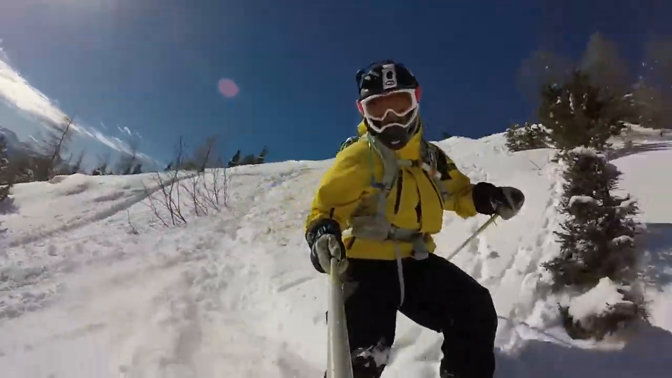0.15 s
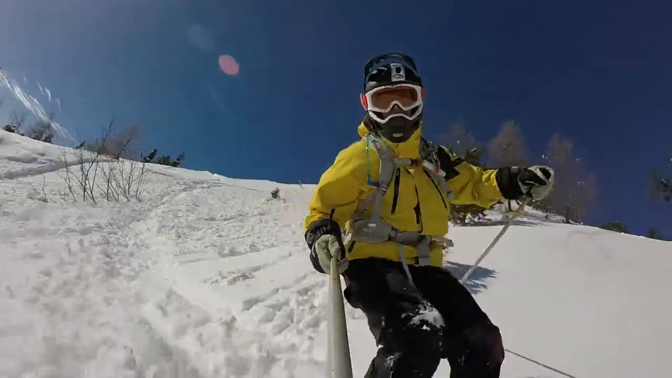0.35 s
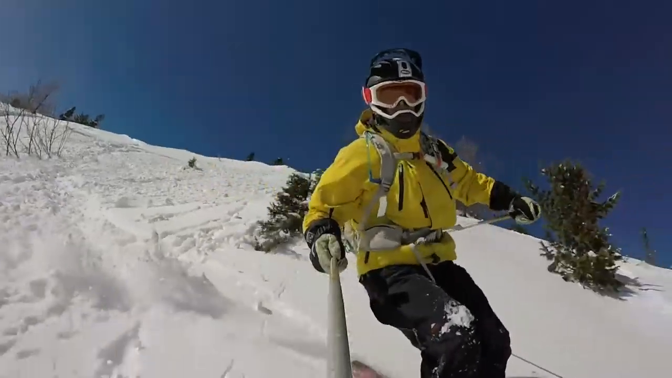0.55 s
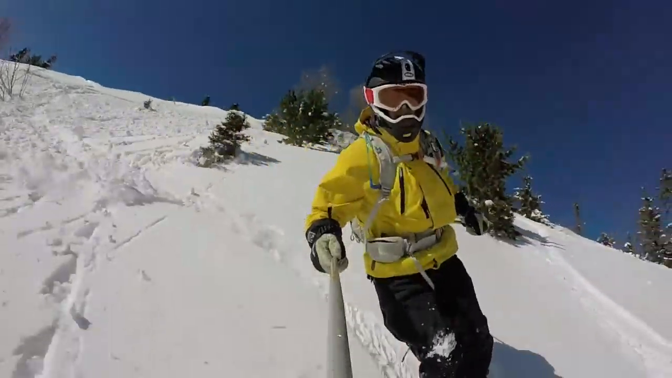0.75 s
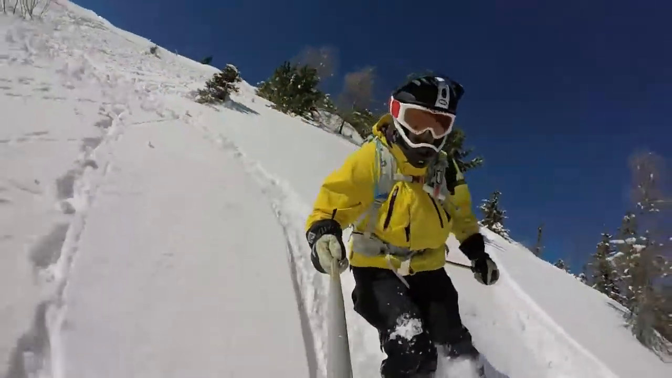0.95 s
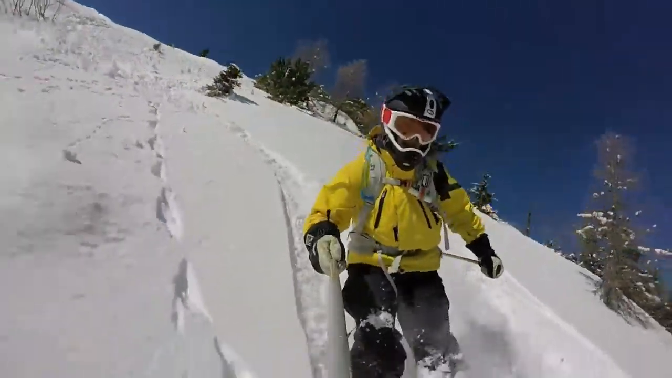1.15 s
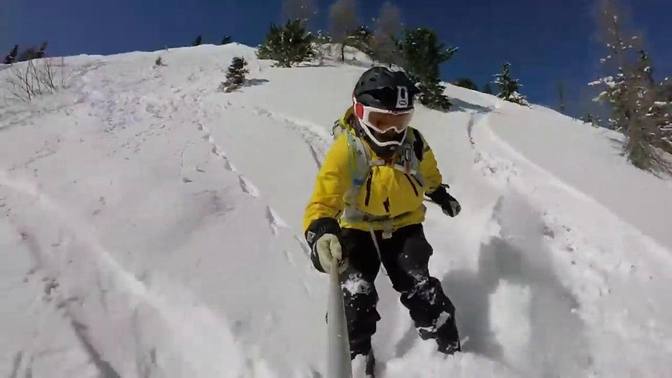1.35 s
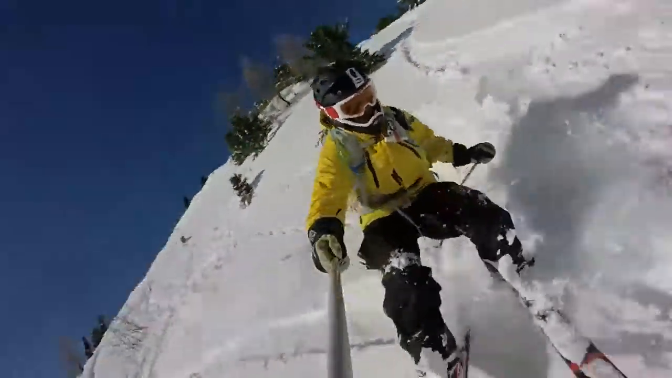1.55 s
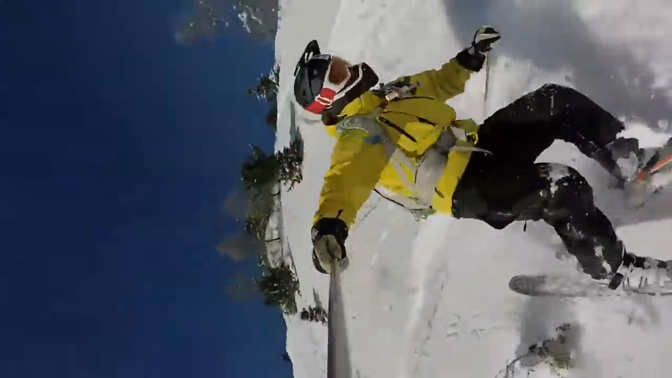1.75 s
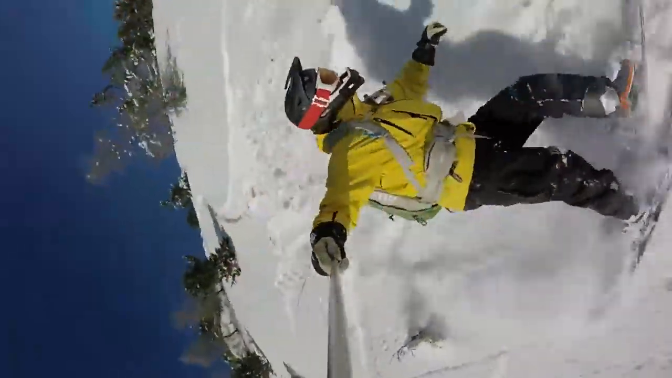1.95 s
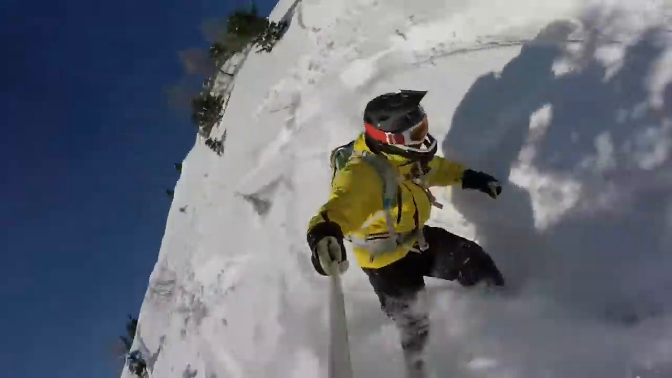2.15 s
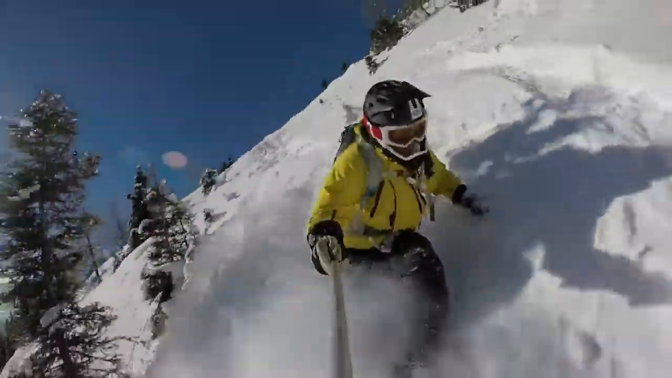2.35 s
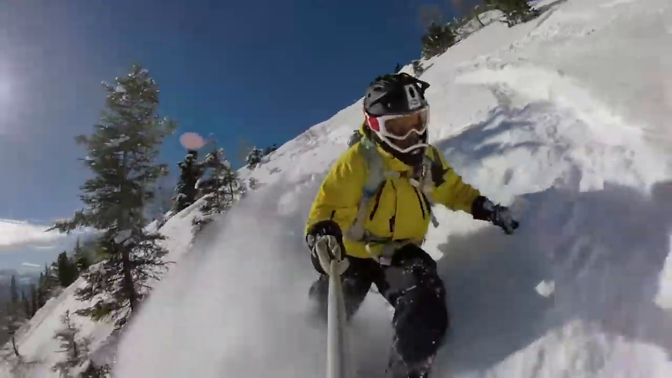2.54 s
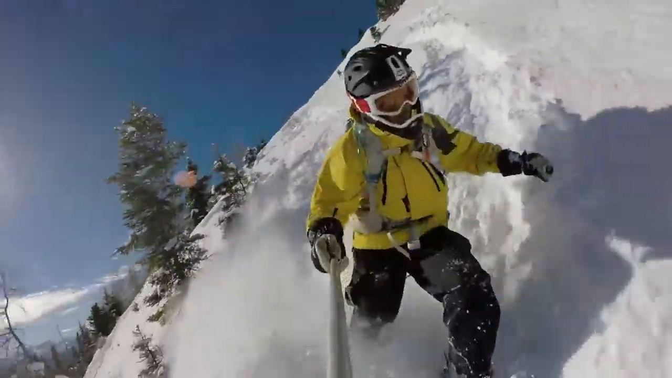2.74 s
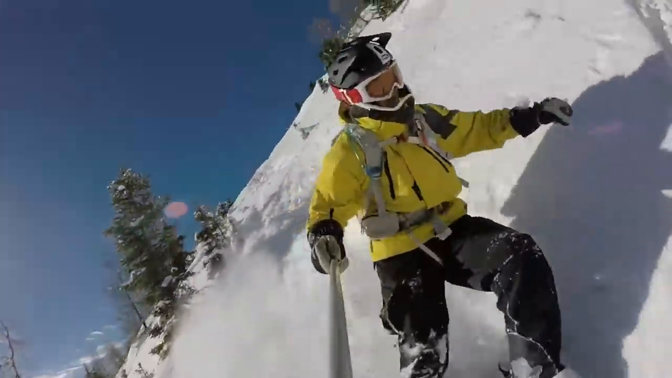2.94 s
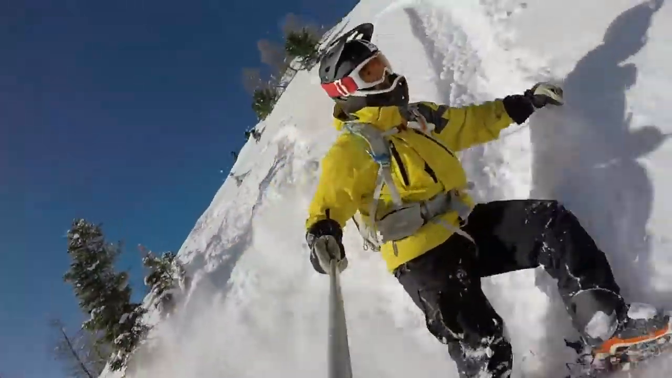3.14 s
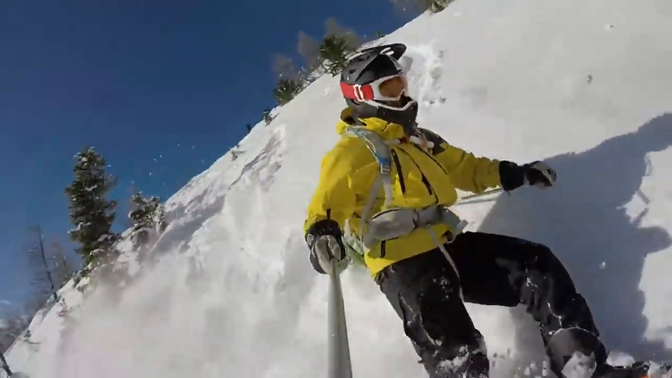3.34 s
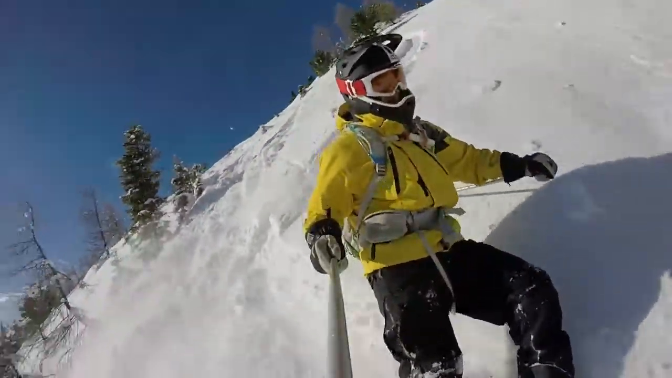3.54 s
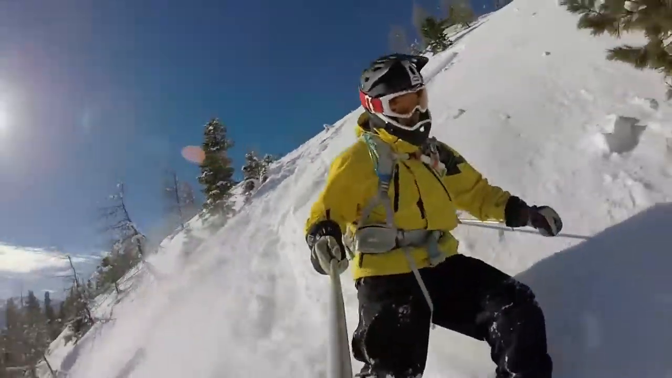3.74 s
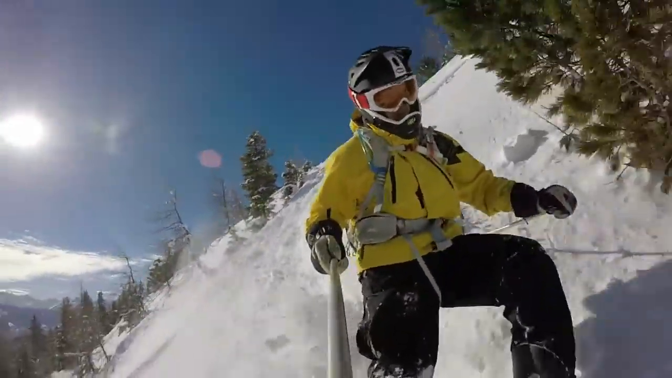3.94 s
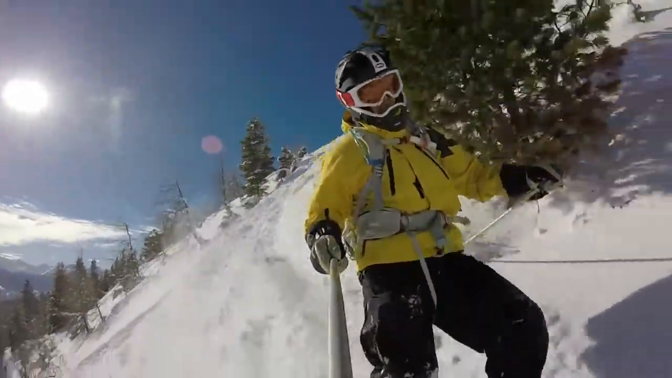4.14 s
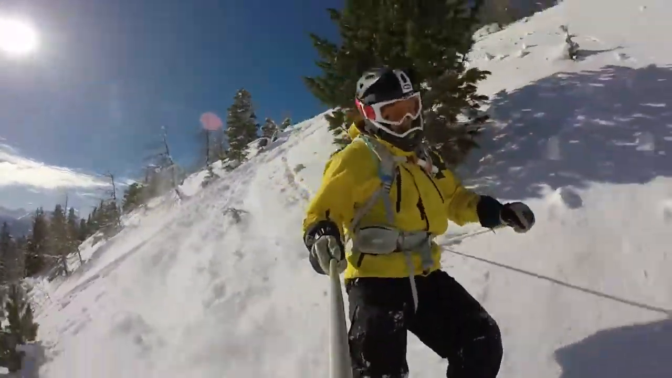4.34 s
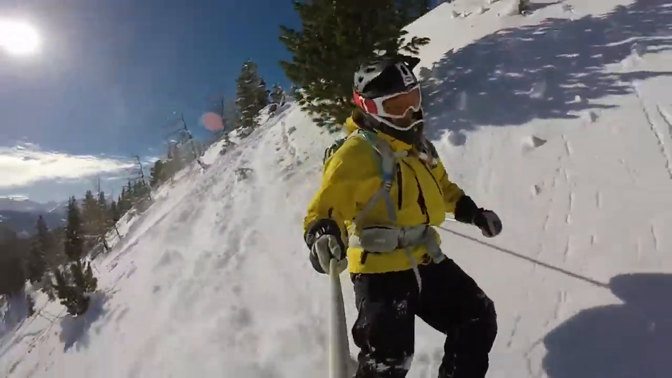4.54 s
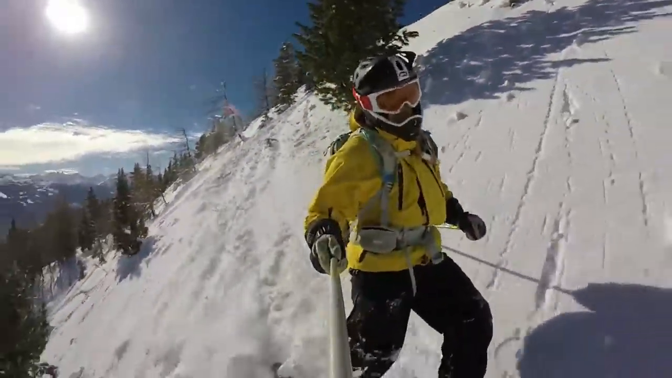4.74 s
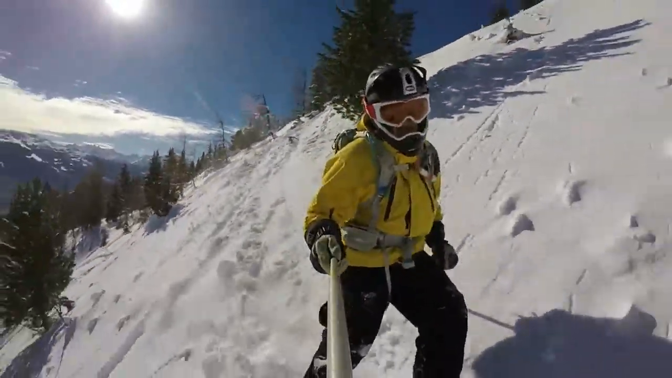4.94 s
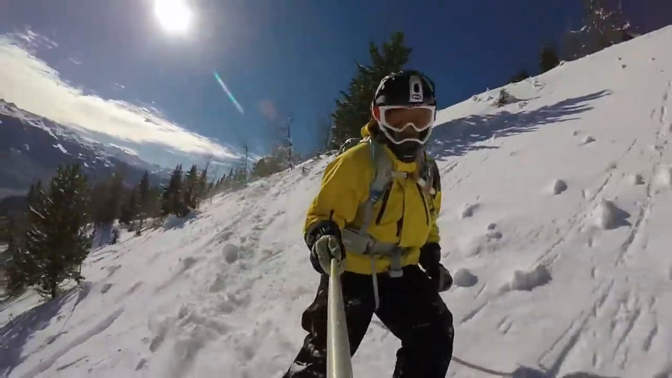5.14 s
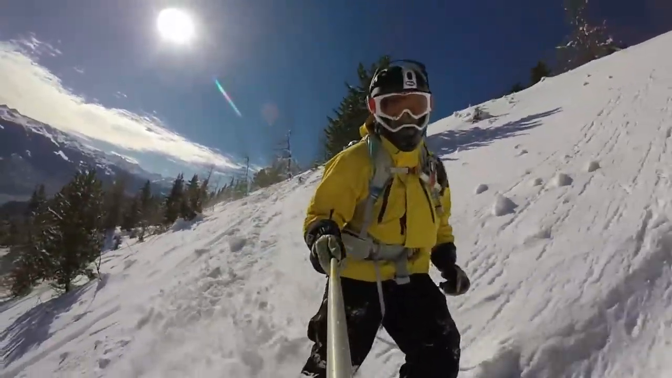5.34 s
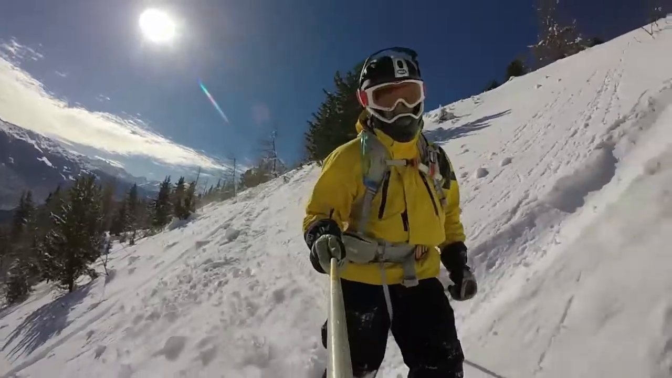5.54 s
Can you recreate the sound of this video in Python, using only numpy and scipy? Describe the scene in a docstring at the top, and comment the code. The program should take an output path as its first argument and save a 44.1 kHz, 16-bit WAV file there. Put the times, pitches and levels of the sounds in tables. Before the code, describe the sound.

Skis carve down a soft snowy slope, faint at first then scraping louder, under deep buffeting wind and a few hard clacks.

```python
"""Skiing down soft snow

A skier turns down a slope of soft snow, with a camera in a plastic housing at the end of a pole.
Wind thumps and flutters: noise shaped into big and small eddies. The skis hiss, scrape and throw
spray: showers of tiny random cracks, shaped by load. Crust snaps and lumps crunch: short swells of
coarse grains. Knocks ring the housing and the pole as damped resonances, with a gritty crack."""
import sys
import numpy as np
from scipy import signal
from scipy.fft import rfft, irfft, next_fast_len
from scipy.io import wavfile
from scipy.ndimage import uniform_filter1d, map_coordinates

SR = 44100
rng = np.random.default_rng(int(sys.argv[2]) if len(sys.argv) > 2 else 0)


def waveform_to_disk(signal):
    """Save audio, clipped to [-1, 1], as 16-bit WAV at the path in sys.argv[1]."""
    frames = np.transpose(np.atleast_2d(signal))
    scaled = np.clip(frames, -1, 1) * 32767
    samples = np.round(scaled).astype(np.int16)
    wavfile.write(sys.argv[1], SR, samples)


N = 250929  # length in samples

# Every level is a setting before the trims and wobbles that the functions add.
# slow rise and fall of the wind on the housing: t/s, level/dB
SLOW_WIND = [(0, -36), (.55, -37), (.95, -29.5), (1.5, -27.5), (1.95, -24.5), (2.13, -16), (2.5, -23.5),
             (2.63, -32), (3.1, -32.5), (3.5, -30), (3.85, -30.5), (4.15, -35.5), (5.0, -35.5),
             (5.69, -41.5)]
# single gusts: t/s at the peak, level over the slow wind/dB
SINGLE_GUSTS = [(.33, 2), (.82, 6.5), (1.17, 12.5), (2.71, 5.5), (3.32, 10), (3.66, 4), (4.44, 5),
                (5.11, 2.5)]
# the skis load in each turn and unload between turns:
# t/s, hiss of the bases/dB, rasp of the edges/dB, powder spray/dB
SKI_LEVELS = [(0.0, -65, -63, -68.5), (0.5, -65.5, -63.5, -74.5), (0.86, -68.0, -69, -74),
              (0.93, -61.0, -59.5, -65.5), (1.3, -61.5, -59.0, -68.5), (1.56, -64, -57, -76),
              (1.85, -60, -58, -66.5), (2.22, -62.0, -50.5, -66.5), (2.49, -60.5, -65, -68),
              (2.57, -52, -48, -56.5), (2.72, -49, -47, -65), (2.95, -52, -47, -63),
              (3.26, -51.5, -46.5, -64), (3.36, -61, -56.5, -70.0), (3.55, -63, -59, -71.5),
              (3.85, -50.5, -44.5, -59.5), (4.02, -55, -47, -66.5), (4.28, -49, -44.5, -57),
              (4.56, -50.5, -46.5, -59.5), (4.8, -56.5, -54.5, -63), (5.0, -49.5, -48, -58.5),
              (5.3, -58.5, -54, -68.5), (5.69, -58.5, -55.0, -65.5)]
# the skis flatten as the turn ends: t/s, share of the ploughing power that is a hollow scrape/0-1
SKI_FLATNESS = [(0, 0.034), (4.1, 0.046), (4.55, 0.34), (5.1, 0.45), (5.69, 0.6)]
# crust snapping under an edge: t/s at the peak, fade/s, level/dB, brightness/dB
CRUST_SNAPS = [(0.314, 0.0044, -42, -11), (0.886, 0.0036, -46.5, -5), (.959, 0.0044, -50, -10),
               (1.286, 0.0083, -37.5, -27), (1.813, 0.027, -49.5, 2), (2.047, 0.0066, -40, -4),
               (2.323, 0.0035, -43.5, -14), (3.642, 0.0016, -27.5, -17), (3.655, 0.024, -34.5, -18)]
# lumps of snow crushed under the skis: t/s at the peak, rise plus fall/s, level/dB, weight/dB,
# brightness/dB
SNOW_LUMPS = [(0.658, 0.016, -61, 13.5, -2), (1.126, 0.016, -49.5, 9, -11), (1.173, .036, -39, 4, -9.5),
              (1.207, 0.013, -43.5, 7, -11), (1.349, .035, -60, 17.5, -8), (1.47, 0.012, -52.5, 4.5, 0),
              (1.676, 0.02, -45.5, 2.5, -1.5), (1.767, 0.038, -47.5, 8, -13), (2.111, 0.039, -40, 10, -8),
              (2.754, 0.035, -45, 3.5, 4), (2.824, 0.01, -34, -8, -5), (3.081, 0.016, -36, -1.5, -6),
              (3.168, 0.049, -37, -3, -8), (3.262, 0.034, -32.5, -4.5, -3.5), (4.275, 0.031, -40, -8, -14)]
# knocks and soft bumps on the pole: t/s, level/dB, hardness as a treble limit f/Hz, thud/dB
POLE_KNOCKS = [(1.1135, -16, 6440, -21), (1.1150, -7, 3140, -23), (1.1157, -15, 2880, 7),
               (1.2627, -16, 3180, -19), (1.293, -28, 3100, -25), (1.957, -18.5, 2200, 2.5),
               (3.379, -51.5, 495, 18), (4.437, -50, 500, 13), (5.117, -50.5, 190, 12.5)]

# resonances of the housing: f/Hz, width/Hz, level/dB
HOUSING_MODES = [(632, 130, -10.5), (854, 97, -7.5), (1410, 124, -1.5), (1850, 290, -1), (2470, 460, -2),
                 (3210, 450, -1.5), (4340, 890, -6.5), (6640, 630, -10)]
# resonances of the pole: f/Hz, width/Hz, level/dB
POLE_MODES = [(138, 26.4, 5), (314, 57, -1.5), (413, 27, -10.5), (615, 127, -13), (860, 79, -18)]
# bands the housing changes, nearly all of them muffled: f/Hz, width/Hz, level/dB
HOUSING_BANDS = [(500, 44, -0.5), (985, 16, -4.5), (1680, 340, -2.5), (2130, 81, -4.5), (3840, 110, -10),
                 (13400, 520, 0.5)]

# Tone colours. Only the shape counts, because the coloured sound is set to an rms of 1.
# thump of the big eddies: f/Hz, level/dB
BUFFET_COLOUR = [(12, -12), (25, -4), (42, 2.5), (56, -4.5), (78, -4.5), (98, -17.5), (140, -22.5),
                 (190, -38.5), (300, -39.5), (450, -51), (1000, -51), (3000, -99)]
# flutter of the small eddies, and the thud of a lump: f/Hz, level/dB
FLUTTER_COLOUR = [(60, -56), (135, 2), (215, -5.5), (310, -3), (450, -10), (800, -12), (2000, -17),
                  (10000, -50)]
# snow pushed aside: f/Hz, level/dB
PLOUGH_COLOUR = [(100, -14), (300, -7), (480, -11), (850, -4), (1030, -10), (1200, -1), (1400, 0),
                 (1650, -1.5), (2020, 3.5), (2250, -1.5), (3500, -11), (12000, -85)]
# hollow scrape of flat skis: f/Hz, level/dB
HOLLOW_COLOUR = [(100, -36), (700, -11), (1050, -9.5), (1220, -3), (1450, 2), (1620, 2), (1900, -14),
                 (2250, -21), (3500, -39), (12000, -70)]
# rasp of edges and breaking snow: f/Hz, level/dB
RASP_COLOUR = [(300, -54), (1500, -11), (2200, -13), (2430, 3.5), (2650, 1), (3000, -0.5), (3400, -6),
               (3750, -20), (5000, -55), (12000, -70)]
# hiss of the gliding bases: f/Hz, level/dB
GLIDE_COLOUR = [(2500, -31), (3750, 2), (4200, -1.5), (4800, 1.5), (5150, -3), (5500, 4), (6300, -1),
                (6950, -18), (7600, -6), (8500, -16), (11000, -30.5), (15000, -43)]
# powder spray: f/Hz, level/dB
SPRAY_COLOUR = [(1000, -55), (4000, -2), (7000, -1), (8000, -0.5), (9600, -2.5), (11500, -7),
                (13000, -11.5), (14600, -17.5), (16000, -20)]
# body of crunching snow: f/Hz, level/dB
CRUNCH_COLOUR = [(100, -3), (350, -5.5), (500, -34), (740, -3), (790, -3), (870, 2.5), (1050, -10),
                 (1200, 1), (1360, 7), (1600, -2.5), (1820, 4), (2200, -4.5), (3500, -7.5), (12000, -51)]

GUST_S = 0.033  # rise of a gust, and its fall
DEEP_HZ = 96
PLOUGH_DB, PLOUGH_GROWS = -57, 0.79  # level at the average load; dB more for each dB of load
SNAP_ATTACK_S = 0.0014
RISE_SHARE = 0.7  # part of a lump's length in which it is squeezed before it gives way
CRACK_ATTACK_S, CRACK_FADE_S = 0.0002, 0.00095  # the gritty crack of a hard contact
TOP_HZ = 15500  # the camera keeps nothing from here up


def amp(db):
    """Turn decibels into a gain."""
    return 10 ** (np.asarray(db) / 20)


def unit(x):
    """Scale to an rms (average strength) of 1."""
    return x / np.sqrt(np.mean(x ** 2) + 1e-20)


def curves(rows):
    """Draw straight lines between table rows: one curve for each column after the time."""
    times, *columns = np.transpose(rows)
    return [np.interp(np.arange(N) / SR, times, column) for column in columns]


def wobble(rate):
    """Make a smooth random curve through `rate` random points a second."""
    points = rng.standard_normal(4096)
    return map_coordinates(points, [np.arange(N) * rate / SR], mode="wrap")


def swell(peak_s, rise, fall):
    """Make a bell-shaped envelope; rise and fall are the spreads in seconds on each side."""
    t = np.arange(N) / SR - peak_s
    return np.exp(-.5 * (t / np.where(t < 0, rise, fall)) ** 2)


def filtered(x, response):
    """Multiply the spectrum of x by a response to frequency."""
    size = next_fast_len(len(x) + 8192)  # spare room for the filter's tail
    spectrum = rfft(x, size) * response(np.fft.rfftfreq(size, 1 / SR))
    return irfft(spectrum, size)[:len(x)]


def coloured(x, colour):
    """Give x a tone colour, joining its points on a log frequency axis, at rms 1."""
    f, db = np.transpose(colour)
    return unit(filtered(x, lambda hz: amp(np.interp(np.log(hz + 1), np.log(f), db))))


def ring(x, modes):
    """Let x excite damped resonances; a wider one dies away faster."""
    def response(f):
        total = 0
        for k, (centre, width, db) in enumerate(modes):
            mode = 1j * f * width / (centre * centre - f * f + 1j * f * width)
            total = total + (-1) ** k * amp(db) * mode  # neighbours have opposite signs
        return total
    return filtered(x, response)


def crystals(rate, spread_db, smooth):
    """Scatter tiny cracks of uneven size, `rate` a second on average, over a smooth rush."""
    happens = rng.random(N) < rate / SR
    sign = rng.choice([-1, 1], N)
    # the cap limits loud cracks for a positive spread, faint ones for a negative spread
    size = amp(spread_db * np.minimum(rng.standard_normal(N), 2))
    return unit(unit(happens * sign * size) + smooth * rng.standard_normal(N))


def patchy(x, depth_db):
    """Vary the gain at random in patches a few hundred Hz wide and some 30 ms long."""
    z = signal.stft(x, nperseg=512)[2]
    field = uniform_filter1d(rng.standard_normal(z.shape), size=5, axis=0)  # across frequency
    field = uniform_filter1d(field, size=6, axis=1)  # across time
    return unit(signal.istft(z * amp(depth_db * unit(field)), nperseg=512)[1][:N])


def coarse(colour):
    """Make the coarse grains of packed snow as it breaks, at rms 1."""
    return coloured(patchy(crystals(rate=800, spread_db=5, smooth=0.61), depth_db=4.5), colour)


def wind(buffet_db=-4, flutter_db=-60, follow=0.25, unsteady_db=1.3, small_grows=0.77):
    """Big eddies thump the housing and deepen in gusts; small ones flutter and grow less."""
    gust_db = curves(SLOW_WIND)[0] + unsteady_db * wobble(9.8)
    for peak_s, db in SINGLE_GUSTS:
        gust_db += db * swell(peak_s, GUST_S, GUST_S)
    mean_db = np.mean(gust_db)
    excess_db = gust_db - mean_db

    eddies = coloured(rng.standard_normal(N), BUFFET_COLOUR)
    # the pressure of the eddies evens out within a gust
    local_power = uniform_filter1d(eddies ** 2, size=5000)
    eddies /= np.sqrt(np.abs(local_power) + 1e-6)
    deep = filtered(eddies, lambda hz: 1 / (1 + (hz / DEEP_HZ) ** 8))
    small = eddies - deep
    buffet = amp(excess_db) * deep + amp(small_grows * excess_db) * small

    flutter = coloured(rng.standard_normal(N), FLUTTER_COLOUR)
    flutter = unit(flutter * amp(1.86 * wobble(35)))
    return amp(mean_db + buffet_db) * buffet + amp(flutter_db + follow * excess_db) * flutter


def skis(spray_db=3, hollow_db=2):
    """Snow grains break under the skis; the uneven surface makes all the hiss stutter together."""
    base_db, edge_db, powder_db = curves(SKI_LEVELS)
    load_db = (base_db + edge_db) / 2
    flat = curves(SKI_FLATNESS)[0]
    bumps_db = 1.0 * wobble(28) + 1.1 * wobble(130)
    grains = patchy(crystals(rate=2500, spread_db=3.5, smooth=1.0), depth_db=1.5)

    # snow pushed aside, turning to a hollow scrape as the skis flatten
    scrape = patchy(crystals(rate=2000, spread_db=3.5, smooth=0.51), depth_db=1.5)
    scrape = amp(hollow_db) * coloured(scrape, HOLLOW_COLOUR)
    pushed = np.sqrt(1 - flat) * coloured(grains, PLOUGH_COLOUR) + np.sqrt(flat) * scrape
    plough_db = PLOUGH_DB + PLOUGH_GROWS * (load_db - np.mean(load_db))
    plough = amp(plough_db + 1.5 * bumps_db) * pushed

    # the steel edges chatter on their own as well
    edge = patchy(crystals(rate=1500, spread_db=3, smooth=1.0), depth_db=2.0)
    rasp = amp(edge_db + bumps_db + 1.25 * wobble(60)) * coloured(edge, RASP_COLOUR)
    glide = amp(base_db + 0.67 * bumps_db) * coloured(grains, GLIDE_COLOUR)

    # powder flies in uneven puffs
    dust = patchy(crystals(rate=3000, spread_db=-2.0, smooth=0.92), depth_db=2.75)
    puffs_db = powder_db + spray_db + 0.6 * bumps_db + 2.2 * wobble(13)
    spray = amp(puffs_db) * coloured(dust, SPRAY_COLOUR)
    return plough + rasp + glide + spray


def snaps(rasp_db=-2, body_db=-11, hiss_db=-5, dust_db=-13):
    """Crust breaks at once under an edge and dies away in a gritty rasp."""
    breaking, dry_part = np.zeros((2, N))
    for peak_s, fade, db, bright_db in CRUST_SNAPS:
        snap = amp(db) * swell(peak_s, SNAP_ATTACK_S, fade)
        breaking += snap
        dry_part += snap * amp(bright_db)
    grit = amp(rasp_db) * coarse(RASP_COLOUR) + amp(body_db) * coarse(CRUNCH_COLOUR)
    hiss = amp(hiss_db) * coarse(GLIDE_COLOUR) + amp(dust_db) * coarse(SPRAY_COLOUR)
    return breaking * grit + dry_part * hiss


def lumps(body_db=-4, thud_db=-9, rasp_db=-2, hiss_db=-4, dust_db=-22):
    """Each lump collapses in a swell of coarse grains; heavy ones thud, dry ones hiss."""
    crush, heavy, dry_part = np.zeros((3, N))
    for peak_s, length, db, weight_db, bright_db in SNOW_LUMPS:
        lump = amp(db) * swell(peak_s, RISE_SHARE * length, (1 - RISE_SHARE) * length)
        crush += lump
        heavy += lump * amp(weight_db)
        dry_part += lump * amp(bright_db)
    body = amp(body_db) * coarse(CRUNCH_COLOUR) + amp(thud_db) * coarse(FLUTTER_COLOUR)
    rasp = amp(rasp_db) * coarse(RASP_COLOUR)
    hiss = amp(hiss_db) * coarse(GLIDE_COLOUR) + amp(dust_db) * coarse(SPRAY_COLOUR)
    return heavy * body + crush * rasp + dry_part * hiss


def knocks(thud_db=-5):
    """A short contact rings the housing and thuds in the pole; a softer one has less treble."""
    out = np.zeros(N + SR)  # room for the last ring
    blow = signal.unit_impulse(SR // 8)
    for start_s, db, hard_hz, weight_db in POLE_KNOCKS:
        softening = signal.butter(8, hard_hz, fs=SR, output="sos")
        contact = signal.sosfilt(softening, blow)
        clack, thud = ring(contact, HOUSING_MODES), ring(contact, POLE_MODES)
        clack /= np.abs(clack).max()
        thud /= np.abs(thud).max()
        start = round(start_s * SR)
        out[start:start + len(blow)] += amp(db) * (clack + amp(thud_db + weight_db) * thud)
    return out[:N]


def cracks(grit_db=-17, dust_db=-25, hard_hz=6500):
    """A hard contact grinds for an instant; the crack drops steeply for softer ones."""
    grind = np.zeros(N)
    for start_s, db, hz, _ in POLE_KNOCKS:
        hardness = min(hz / hard_hz, 1) ** 4
        peak_s = start_s + 2 * CRACK_ATTACK_S
        grind += amp(db) * hardness * swell(peak_s, CRACK_ATTACK_S, CRACK_FADE_S)
    grit = amp(grit_db) * coloured(rng.standard_normal(N), GLIDE_COLOUR)
    dust = amp(dust_db) * coloured(rng.standard_normal(N), SPRAY_COLOUR)
    return grind * (grit + dust)


def scene():
    """Open snow gives no echo: the sources simply add."""
    return (wind() + skis() + snaps() + lumps() + knocks() + cracks())[None]


def record(dry):
    """The housing hollows out a few bands; the camera keeps nothing above its band limit."""
    def response(hz):
        gain_db = 0
        for centre, width, db in HOUSING_BANDS:
            gain_db = gain_db + db * np.exp(-.5 * ((hz - centre) / width) ** 2)
        return amp(gain_db) * (hz < TOP_HZ)
    return np.array([filtered(x, response) for x in dry])


dry = scene()
out = record(dry)
waveform_to_disk(out)
```